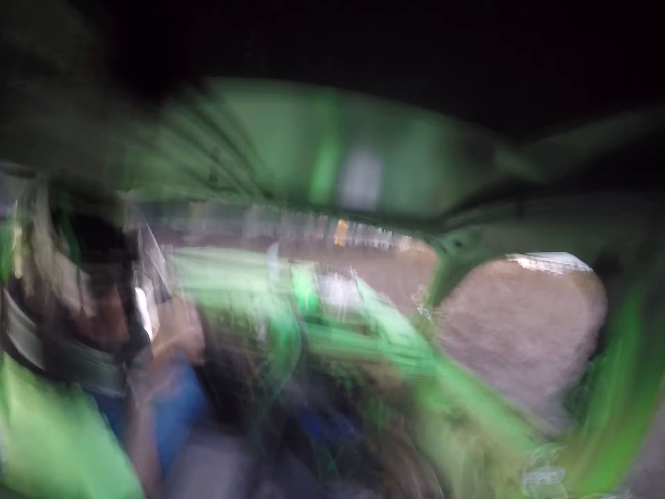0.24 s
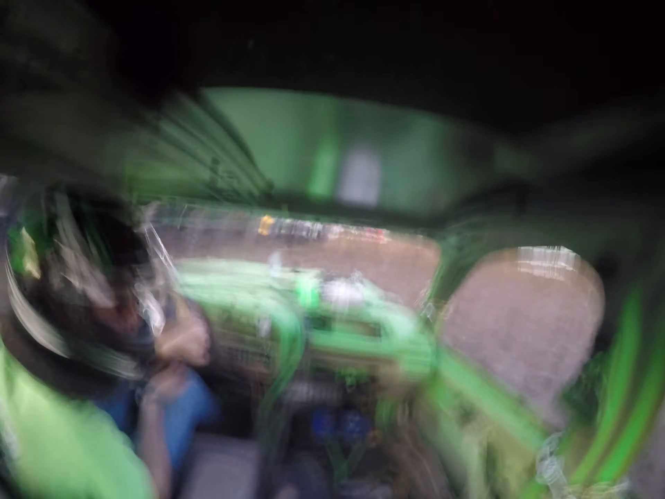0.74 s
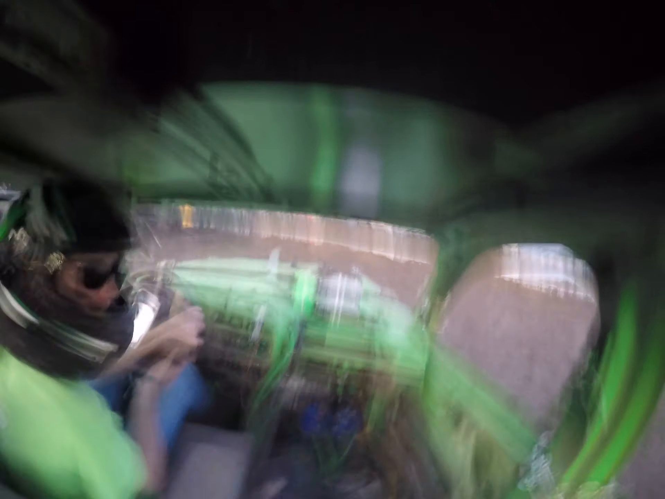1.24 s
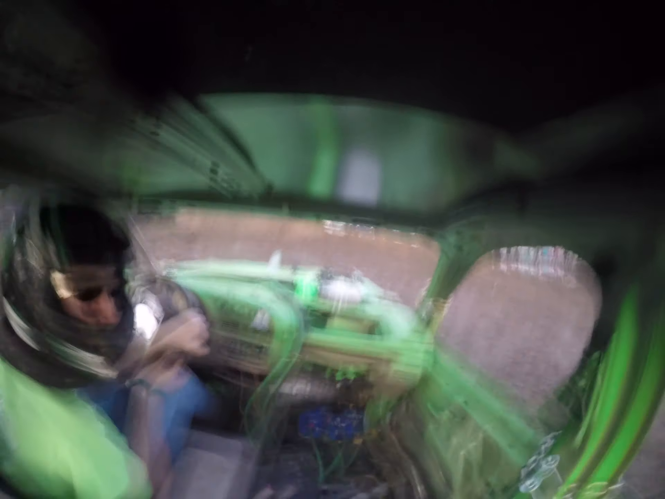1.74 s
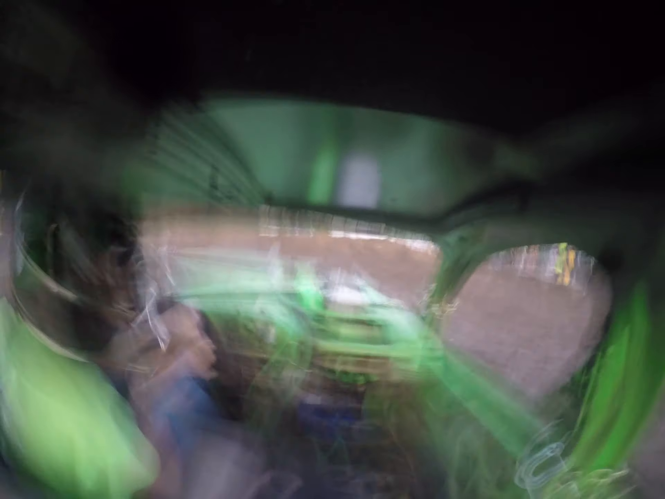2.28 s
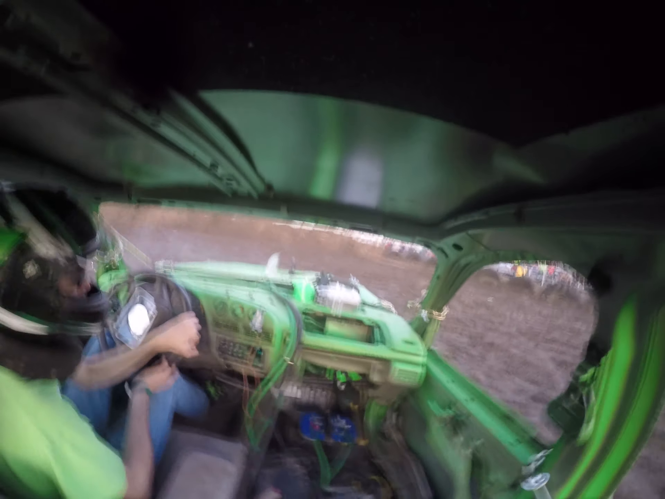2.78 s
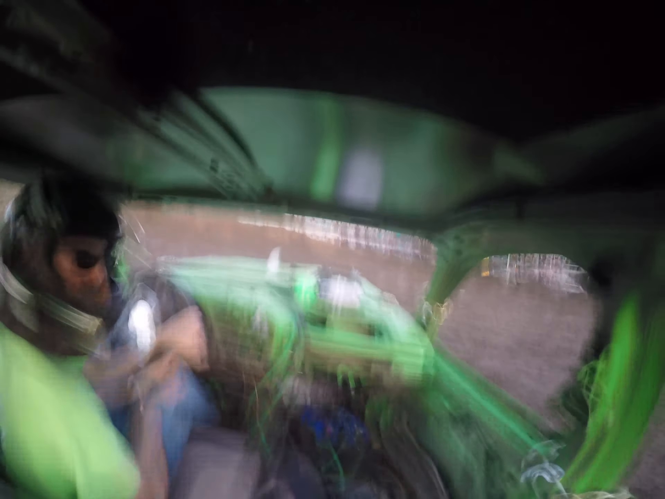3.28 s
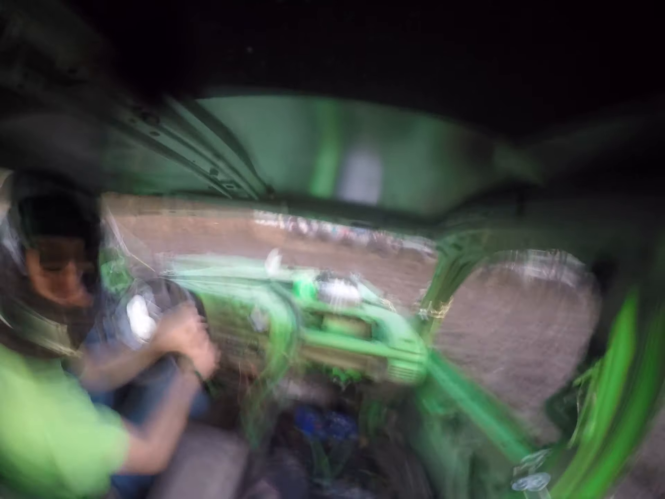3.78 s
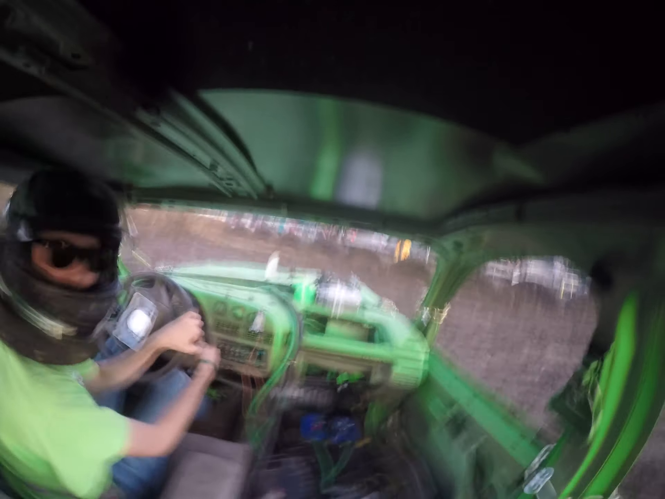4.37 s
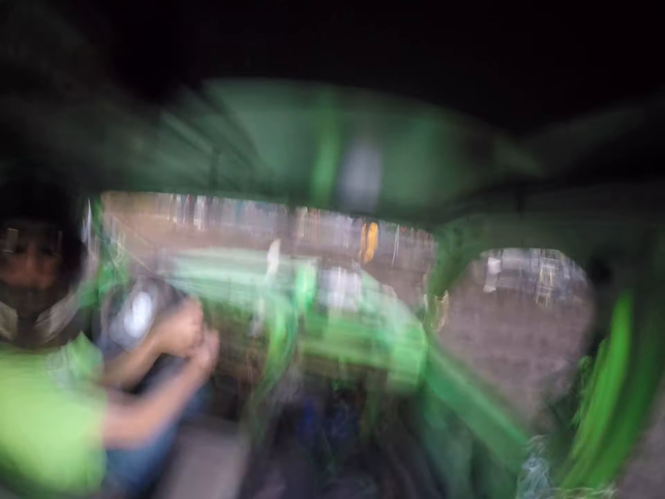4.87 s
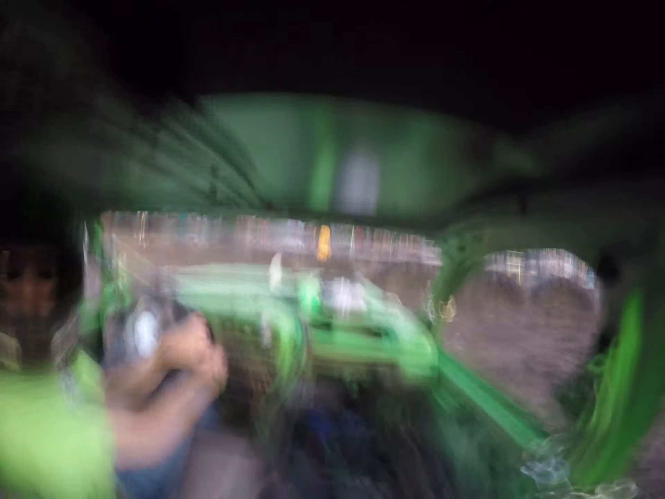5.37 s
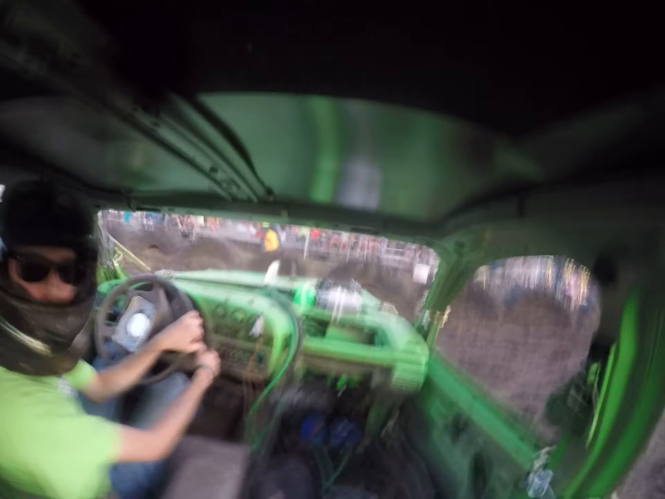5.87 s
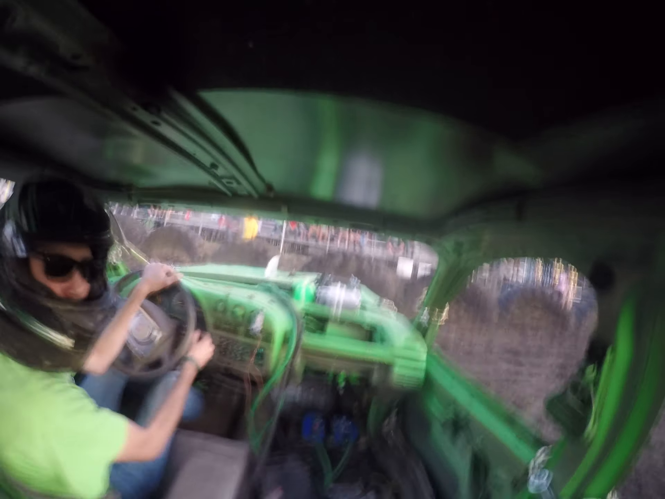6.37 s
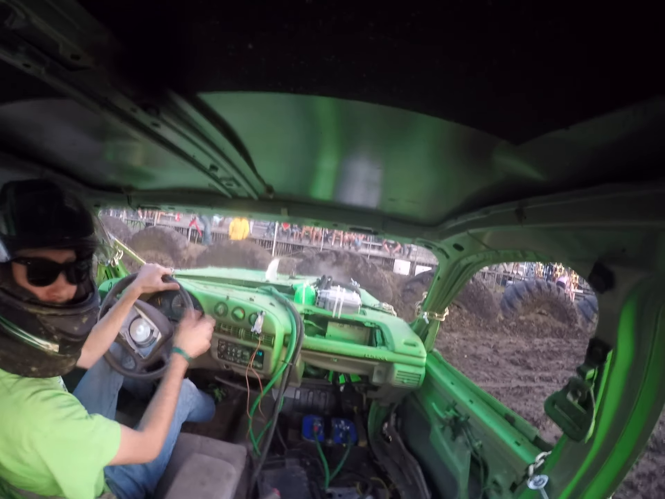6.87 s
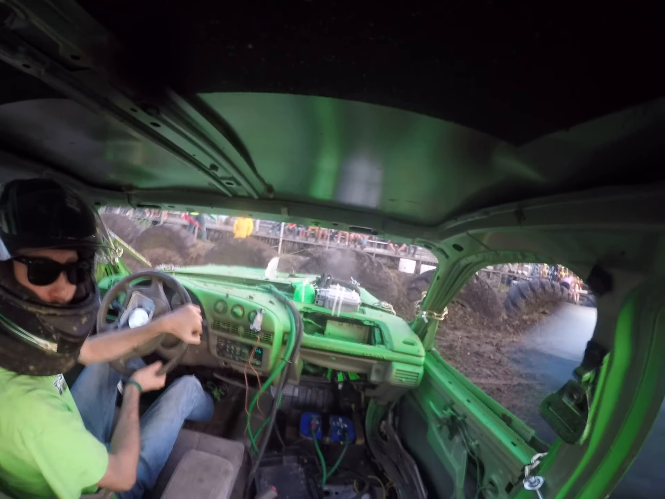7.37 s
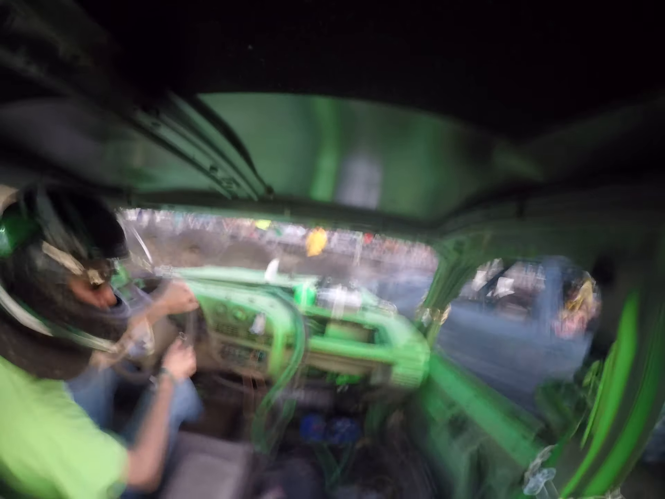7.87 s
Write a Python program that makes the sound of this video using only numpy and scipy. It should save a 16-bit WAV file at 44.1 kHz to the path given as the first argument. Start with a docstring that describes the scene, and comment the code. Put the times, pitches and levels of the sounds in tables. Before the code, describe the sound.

Inside a bare derby car, a damaged wheel slaps and thumps the bodywork over a labouring engine, which drops, revs up and hits with a metal crunch.

```python
"""Inside a battered derby car

An engine labours, drops back and revs up into a collision on a dirt arena: a sum of sine waves plus pulsing noise.
A damaged wheel slaps and thumps the body, at first about five times a second: decaying sines and noise bursts.
Loose parts clack and tick in short noise bursts, while the bare cab booms, rumbles and drones as it shakes.
The collision is crackling noise that comes in stages. The hardest blows overload the microphone."""
import sys
import numpy as np
from scipy import signal
from scipy.fft import rfft, irfft
from scipy.io import wavfile
from scipy.ndimage import uniform_filter1d

SR = 44100
rng = np.random.default_rng(int(sys.argv[2]) if len(sys.argv) > 2 else 0)


def dump_mix(stems):
    """Bounce the given channels to the path in sys.argv[1] as a 16-bit WAV at rate SR."""
    frames = np.atleast_2d(stems).T  # one column per channel
    limited = np.clip(frames, -1, 1)  # hard clip at full scale
    pcm = np.round(limited * 32767).astype(np.int16)
    wavfile.write(sys.argv[1], SR, pcm)


N = 358974
TIME = np.arange(N) / SR  # seconds

# Roughness of the ride. Each row: time in seconds, reference level in dB for the noises that follow the ride.
RIDE = [(0, -25), (.9, -29.5), (1.3, -26.5), (2.2, -26.5), (2.55, -34), (3.1, -35.5), (3.6, -28.5),
        (4.45, -35.5), (4.92, -23.5), (5.3, -30.5), (6.17, -26), (6.4, -40), (6.85, -51.5), (7.15, -37),
        (7.48, -29), (7.65, -30.5), (7.9, -29.5), (8.14, -37)]
# Body rocking on its springs. Each row: time in seconds, cab boom level in dB.
BOOM = [(0.0, -10.5), (0.27, -17.5), (1.29, -13.5), (1.92, -34), (1.99, -13), (2.31, -27), (3.33, -14.5),
        (4.38, -13), (4.42, -23), (4.87, -8.5), (5.28, -24.5), (5.4, -8), (5.67, -20), (8.14, -14.5)]
# Deep ruts jolt the chassis. Each row: start in seconds, peak of the swing in dB.
JOLTS = [(0.131, -10.5), (0.371, -22), (2.071, -9), (2.461, -11.5), (3.171, -6.5), (3.329, -13.5),
         (3.51, -7.5), (4.11, -6), (4.68, -10), (4.81, -20), (5.75, -17.5), (5.94, -11), (6.139, -10),
         (7.531, -10), (7.79, -11.5), (7.97, -9.5)]
# Tone of the low rumble. Each row: frequency in Hz, relative level in dB.
RUMBLE_TONE = [(25, -25.5), (40, 9), (50, 6), (65, 0.5), (90, -2.5), (125, -7), (200, -38.5)]
# Tone of the floor pan drone. Each row: frequency in Hz, relative level in dB.
DRONE_TONE = [(70, -21.5), (110, -4.5), (140, -0.5), (180, -4), (230, -0.5), (275, -2.5), (320, -15),
              (450, -39)]

# Engine speed. Each row: time in seconds, firing rate in Hz, exhaust level in dB before the pipe's tone.
ENGINE = [(0, 116.5, -36), (1.1, 122, -31.5), (2.65, 107.3, -38), (2.98, 117.8, -20), (3.35, 111.9, -28.5),
          (3.72, 117.9, -30.5), (3.9, 109.8, -25), (4.3, 117.5, -31), (5.3, 116.7, -30), (6.3, 62.7, -35.5),
          (6.85, 72.1, -39.5), (7.09, 79.8, -22.5), (7.28, 105.8, -16.5), (7.36, 111.1, -14.5),
          (7.49, 121, -13.5), (7.8, 92.6, -47), (8.14, 74, -28)]
# Notes of the uneven cylinders. Each row: multiple of the firing rate, relative level in dB.
ENGINE_ORDERS = [(.5, -26), (1, -1.5), (1.25, -34), (1.5, -3), (1.75, -13.5), (2, -9.5), (2.25, -18),
                 (2.5, -11.5), (3, -19)]
# How the exhaust pipe favours some pitches. Each row: frequency in Hz, gain in dB.
PIPE_TONE = [(40, -16), (85, 6), (109, 4), (118, -9), (130, -8.5), (155, -1), (176, 0.5), (200, 2.5),
             (228, -6.5), (255, 2), (277, -3), (305, -50), (385, -22), (500, -24)]
# Tone of the engine roar. Each row: frequency in Hz, relative level in dB.
ROAR_TONE = [(200, -13), (330, 7), (500, 8.5), (720, 11), (900, -5), (1200, 4.5), (1600, -4.5),
             (2300, -2.5), (2900, -35), (3500, -63.5), (6000, -36)]
# Tone of the engine rasp. Each row: frequency in Hz, relative level in dB.
RASP_TONE = [(900, 6), (1800, -2.5), (2450, 5.5), (2950, -2.5), (3300, -1), (4300, -3), (4800, -9.5),
             (5400, -9.5), (7000, -15.5), (8500, -23.5), (10800, -20.5), (12500, -29), (15000, -30)]
# A narrow resonance in the rasp. The one row: frequency in Hz, width in Hz, level in dB relative to the rasp.
RASP_RING = (2910, 69, -8)
# Throttle. Each row: time in seconds, reference level in dB (the treble of the rasp).
THROTTLE = [(0, -42.5), (.25, -51), (1.25, -46), (1.65, -55.5), (2.2, -54), (2.68, -61), (2.8, -57.5),
            (3.22, -51), (4.24, -51.5), (4.46, -54), (4.98, -49), (5.7, -64.5), (6.1, -65), (6.4, -73),
            (6.8, -65.5), (7.18, -44), (7.46, -41.5), (7.64, -58), (8.14, -63)]

# A loose part clacking hard. Each row: start in seconds, peak in dB.
CLACKS = [(0.2543, -12), (0.3168, -18), (0.4643, -15.5), (0.8674, -3.5), (1.0207, -13.5), (1.2099, -10),
          (1.3053, -8), (1.707, -8), (2.0072, -7), (2.3895, -13.5), (2.4905, -19), (3.5696, -17.5),
          (3.8288, -14), (3.922, -16.5), (4.0203, -16), (4.2512, -7.5), (4.3301, -8), (4.8157, -7.5),
          (4.8571, -14), (4.99, -9.5), (5.0499, -9), (5.315, -18), (5.3544, -10.5), (5.46, -10),
          (5.5273, -12), (5.6075, -18), (5.674, -15.5), (5.7498, -14.5), (5.9774, -9.5), (6.1422, -13),
          (6.3052, -23.5), (6.3894, -20), (6.7176, -38), (7.8635, -12.5), (7.9245, -14.5), (7.9619, -14.5),
          (8.0006, -16), (8.04, -13)]
# Tone of a clack. Each row: frequency in Hz, relative level in dB.
CLACK_TONE = [(300, -14.5), (900, -4.5), (1500, -12.5), (1900, -2.5), (2450, 1), (2800, -4.5), (3300, -18),
              (4200, -25), (5400, -29), (7500, -45), (15000, -46.5)]
# Small hard bits ticking. Each row: start in seconds, peak of the treble in dB.
TICKS = [(0.052, -27), (0.1281, -22), (0.184, -40), (0.3155, -36), (1.4783, -22.5), (1.6768, -25),
         (2.0859, -17), (2.336, -32), (2.4934, -37.5), (4.2184, -32.5), (4.3286, -25), (4.8218, -29.5),
         (4.9317, -23.5), (5.0115, -33.5), (5.3824, -31.5), (5.9358, -32), (6.1464, -35)]
# Tone of a tick. Each row: frequency in Hz, relative level in dB.
TICK_TONE = [(800, -33), (2500, 18.5), (4000, 9.5), (5500, 3.5), (7200, 1.5), (9000, -10.5), (11000, -1.5),
             (13000, -13), (15500, -9)]

# Sheet metal giving way in stages. Each row: start in seconds, level in dB.
CRASH = [(7.498, -3.5), (7.52, -12.5), (7.570, -9.5), (7.596, -16.5), (7.618, -35), (7.785, -37)]
# Tone of crumpling metal. Each row: frequency in Hz, relative level in dB.
CRUMPLE_TONE = [(50, -9), (140, 13.5), (270, 11.5), (400, -4), (590, 6), (1000, 0.5), (1600, -4),
                (2500, -5.5), (3300, -16.5), (4500, -25), (7000, -33.5), (10000, -45.5), (15000, -42)]

# Heavy thumps on the floor pan. Each row: start in seconds, peak in dB, strongest ring in Hz.
THUMPS = [(0.13, 0.5, 224), (0.86, -11.5, 124), (1.14, -14.5, 246), (1.292, -1.5, 190), (1.477, 1.5, 184),
          (1.677, -0.5, 154), (1.875, -5, 121), (2.086, 3, 156), (2.276, -1.5, 183), (4.121, -12.5, 192),
          (4.204, -6.5, 210), (4.805, -5.5, 172), (4.924, -7, 269), (5.001, -5.5, 134), (5.213, -10, 254),
          (5.548, -8, 149), (5.737, -6.5, 123), (5.764, -7.5, 245), (5.938, -3, 185), (6.138, -6.5, 149),
          (6.225, -11, 121), (6.387, -19.5, 121), (7.801, -10, 206.4)]
# Ringing of the floor pan. Each row: frequency in Hz, strength in dB, time to fall 60 dB in seconds.
FLOOR_PAN_MODES = [(120.6, 5, 0.1), (148.1, -1, 0.13), (184.4, 5.5, 0.069), (225.7, 0, 0.11),
                   (264.6, -1, 0.12), (370, -15.5, 0.14)]
# Tyre slapping sheet metal. Each row: start in seconds, peak of the panel ring in dB,
# strongest ring in Hz, mid-band level of the smack in dB.
SLAPS = [(0.052, -2.5, 614, -14.5), (0.239, -8.5, 548, -20.5), (0.449, -15.5, 550, -35),
         (0.66, -13, 522, -31), (0.865, -7, 550, -39), (1.208, -18, 716, -47), (1.398, -1, 520, -12.5),
         (1.598, -9, 650, -14.5), (1.792, -5.5, 578, -14), (2.004, -3.5, 600, -19),
         (2.197, -3.5, 690, -14.5), (3.618, -7.5, 623, -27), (4.914, -4.5, 554, -10), (5.456, -8, 596, -21),
         (5.526, -17, 668, -30), (5.856, -20.5, 540, -42), (6.05, -6, 855, -16.5),
         (6.222, -12.5, 614, -23.5), (6.635, -33.5, 720, -42), (6.718, -29.5, 610, -35),
         (7.758, -18.5, 634.8, -37)]
# Ringing of the panel. Each row: frequency in Hz, strength in dB,
# time to fall 60 dB in seconds before the extra fading of a slap.
PANEL_MODES = [(381, 2.5, 0.094), (474.5, 2, 0.11), (548.8, -1.5, 0.31), (563, 2.5, 0.074), (653, 3, 0.082),
               (713.5, -5, 0.17), (840, -7.5, 0.13), (971, -4.5, 0.2), (1114, 0, 0.1)]
# Tone of a smack. Each row: frequency in Hz, relative level in dB.
SMACK_TONE = [(200, -12.5), (380, 16.5), (650, 17.5), (1150, 15.0), (1900, 8), (2700, 5.5), (3400, -14.5),
              (6000, -22.0)]
# Tone of the bodywork's shudder. Each row: frequency in Hz, relative level in dB.
SHUDDER_TONE = [(220, -19.0), (370, -1.5), (620, -5), (1200, -23), (2000, -42.5)]

# Between jolts the low noise follows the ride.
RUMBLE_OVER_RIDE_DB, DRONE_OVER_RIDE_DB = 7.5, 1
# The chassis swings up in this time, near this pitch, with this spread as a fraction of the pitch.
JOLT_RISE_S, JOLT_HZ, JOLT_SCATTER = 0.023, 53.44, 0.1
# The roar grows with the throttle and with the roughness of the ride.
ROAR_OVER_THROTTLE_DB, ROAR_OVER_RIDE_DB = 4.5, -12.5
RASP_OVER_THROTTLE_DB = 8  # the whole rasp, relative to its treble
# Every blow throws a loose part: lag after a slap, level after a 0 dB blow, dB per dB of blow.
SHAKE_DELAY_S, SHAKE_DB, SHAKE_GROWTH = 0.011, -14, 0.85
# Lesser clacks come at random, this often when the ride is at this level and less often when it is smoother.
RATTLES_PER_S, ROUGH_RIDE_DB = 18, -27
RATTLE_OVER_RIDE_DB, RATTLE_SPREAD_DB = 6, 2.5
BLOW_TICK_DB = -33.5  # treble of the tick, relative to the blow that shakes the small bits
TICK_BODY_DB = 8  # a whole tick, relative to its treble
CRUNCH_RISE_S, CRUNCH_DECAY_S = 0.0044, 0.025
SCRAPE_DB, SCRAPE_S = -30, 0.36  # the cars grind along each other for this long
REBOUND_S, REBOUND_DB, REBOUND_HZ = 0.02, -6.5, 230  # each thump lands a second time
SLAP_PAN_DB, SLAP_PAN_HZ = -2, 222  # a slap also swings the floor pan, this much weaker, around this pitch
# Mainly hard thumps ring the panel: level after a 0 dB thump, dB per dB of thump, pitch.
THUMP_PANEL_DB, THUMP_PANEL_GROWTH, THUMP_PANEL_HZ = -7.5, 2.16, 479
THUMP_SMACK_DB = -3.5  # smack of a thump, relative to the panel ring
SMACK_CREST_DB = 8  # peak of a slap's smack above its mid-band level
CUTOFF_HZ = 15400  # upper limit of the microphone sound


def amp(db):
    """Turns decibels into gain."""
    return 10 ** (np.asarray(db) / 20)


def unit(x):
    """Scales a sound to rms 1."""
    return x / np.sqrt(np.mean(x ** 2) + 1e-20)


def crest(x):
    """Scales a sound to peak 1."""
    return x / (abs(x).max() + 1e-20)


def curves(rows):
    """Turns each column of a table into a curve over the whole time."""
    s, *columns = np.transpose(rows)
    return [np.interp(TIME, s, column) for column in columns]


def since(s):
    """Seconds since time s, zero before it."""
    return np.maximum(TIME - s, 0)


def shape_db(points, hz):
    """Reads a tone table on a log-frequency axis; the level falls away beyond its ends."""
    f, db = np.transpose(points)
    octave, known = np.log2(hz + 1), np.log2(f + 1)
    outside = abs(octave - np.clip(octave, known[0], known[-1]))
    return np.interp(octave, known, db) - 20 * outside


def colour(x, points, size=8192):
    """Filters a sound to the given tone without starting ahead of it (a minimum-phase filter)."""
    hz = abs(np.fft.fftfreq(size, 1 / SR))
    log_gain = np.log(amp(shape_db(points, hz)) + 1e-5)
    response = np.exp(np.conj(signal.hilbert(log_gain)))
    taps = np.fft.ifft(response).real[:size // 2]
    return signal.oaconvolve(x, taps)[:len(x)]


def wander(rate_hz):
    """Slow random motion of rms 1: noise with its faster part removed."""
    spectrum = rfft(rng.standard_normal(N))
    slow = np.exp(-(np.fft.rfftfreq(N, 1 / SR) / rate_hz) ** 2)
    return unit(irfft(spectrum * slow, N))


def steady(x, seconds):
    """Evens out the swells of a noise that are slower than the given time."""
    power = uniform_filter1d(x ** 2, max(int(seconds * SR), 2))
    return x / np.sqrt(abs(power) + 1e-12)


def add(mix, s, sound):
    """Mixes a sound in at time s."""
    part = mix[max(round(s * SR), 0):][:len(sound)]
    part += sound[:len(part)]


def burst(t, rise, decay):
    """Noise that swells softly and dies away; both times are in seconds."""
    return rng.standard_normal(len(t)) * (1 - np.exp(-(t / rise) ** 2)) * np.exp(-t / decay)


def ring(modes, t, centre_hz, octaves, scatter, rise):
    """Struck metal: decaying sines, where the place of the blow favours those near centre_hz."""
    hz, db, t60 = np.transpose(modes)[:, :, None]
    detune, phase = rng.standard_normal((2, len(modes), 1))
    favour = 1 / (1 + (np.log2(hz / centre_hz) / octaves) ** 2)
    weight = amp(db - 60 * t / t60) * favour
    swing = np.sin(2 * np.pi * (hz * (1 + scatter * detune) * t + phase))
    return crest((weight * swing).sum(0) * (1 - np.exp(-(t / rise) ** 2)))


def shell(x, wet_db, t60):
    """Dense early reflections between bare steel walls, cut after 0.1 s and duller than the direct sound."""
    t = TIME[:SR // 10]
    taps = unit(rng.standard_normal(len(t)) * amp(-60 * t / t60)) / np.sqrt(len(t))
    taps = signal.lfilter(*signal.butter(2, 3500, fs=SR), taps)
    return x + amp(wet_db) * signal.oaconvolve(x, taps)[:len(x)]


def cab():
    """The cab booms at its lowest resonance, the chassis rumbles and swings over ruts, the floor pan drones."""
    boom_db, = curves(BOOM)
    ride_db, = curves(RIDE)
    boom_hz = 28.76 * (1 + 0.1306 * wander(7.33))
    boom = unit(np.sin(2 * np.pi * np.cumsum(boom_hz) / SR) * amp(1.6 * wander(4.8)))
    rumble = steady(colour(rng.standard_normal(N), RUMBLE_TONE), 0.064) * amp(4.1 * wander(11))
    drone = steady(colour(rng.standard_normal(N), DRONE_TONE), 0.28)
    low_noise = rumble * amp(RUMBLE_OVER_RIDE_DB) + drone * amp(DRONE_OVER_RIDE_DB)
    out = boom * amp(boom_db) + low_noise * amp(ride_db)
    for s, db in JOLTS:
        age = since(s) / JOLT_RISE_S
        hz = JOLT_HZ * (1 + JOLT_SCATTER * rng.uniform(-0.86, 1))
        swell = age * np.exp(1 - age)  # reaches 1 after the rise time
        out += amp(db) * swell * np.sin(2 * np.pi * hz * since(s))
    return out


def engine():
    """Multiples of the firing rate sound through the pipe; roar and rasp are noise pulsing with the firing."""
    firing_hz, exhaust_db = curves(ENGINE)
    throttle_db, = curves(THROTTLE)
    ride_db, = curves(RIDE)
    firings = np.cumsum(firing_hz * (1 + .008 * wander(14))) / SR  # running count, slightly uneven
    note = np.zeros(N)
    for k, db in ENGINE_ORDERS:
        throb_db = 2.5 * wander(14)
        level_db = db + shape_db(PIPE_TONE, k * firing_hz) + throb_db
        note += amp(level_db) * np.sin(2 * np.pi * k * (firings + rng.random()))
    # One pulse per firing, and a slower one that favours every other firing.
    puffs = 1 + 0.18 * np.cos(2 * np.pi * firings) + 0.23 * np.cos(np.pi * firings)
    roar = unit(colour(rng.standard_normal(N) * puffs * amp(1.8 * wander(25)), ROAR_TONE))
    rasp = unit(colour(rng.standard_normal(N) * puffs * amp(1.0 * wander(26)), RASP_TONE))
    ring_hz, width_hz, ring_db = RASP_RING
    resonance = signal.lfilter(*signal.iirpeak(ring_hz, ring_hz / width_hz, SR), rasp)
    rasp += amp(ring_db) * unit(resonance)
    roar_gain = np.hypot(amp(throttle_db + ROAR_OVER_THROTTLE_DB), amp(ride_db + ROAR_OVER_RIDE_DB))
    hiss = roar * roar_gain + rasp * amp(throttle_db + RASP_OVER_THROTTLE_DB)
    return note * amp(exhaust_db) + shell(hiss, wet_db=-10.5, t60=0.27)


def chatter(ride_db):
    """Faint chatter of loose parts: many random tiny grazes, louder on a rough ride."""
    hits = rng.random(N) < 60 / SR  # about 60 a second
    strikes = hits * amp(4 * np.minimum(rng.exponential(1, N), 2))
    grazes = signal.oaconvolve(strikes, np.hanning(SR // 300), "same") * rng.standard_normal(N)
    return unit(colour(grazes, CLACK_TONE)) * amp(0.73 * ride_db - 27.5)


def clatter():
    """Loose parts strike and rebound in short noise bursts, shaken by each blow and by the ride."""
    clacks, ticks, t = np.zeros(N), np.zeros(N), TIME[:SR // 12]
    ride_db, = curves(RIDE)
    blows = [(s + SHAKE_DELAY_S, db) for s, db, *_ in SLAPS] + [(s, db) for s, db, _ in THUMPS]
    thrown = [(s, SHAKE_DB + SHAKE_GROWTH * db) for s, db in blows]
    rattle_db = ride_db + RATTLE_OVER_RIDE_DB + RATTLE_SPREAD_DB * rng.standard_normal(N)
    rattle_rate = RATTLES_PER_S * amp(ride_db - ROUGH_RIDE_DB)
    rattle_samples = np.flatnonzero(rng.random(N) < rattle_rate / SR)
    rattles = [(TIME[i], rattle_db[i]) for i in rattle_samples]
    for s, db in CLACKS + thrown + rattles:
        contact = burst(t, 0.0015, 0.00065) + 0.058 * burst(t, 0.0014, 0.0026)
        clack = amp(db) * crest(colour(contact, CLACK_TONE))
        add(clacks, s - .0004, clack)
        add(clacks, s + rng.uniform(.008, 0.029), amp(rng.uniform(-13.5, -5.5)) * clack)  # rebound
    shaken = [(s, db + BLOW_TICK_DB) for s, db in blows]
    for s, db in TICKS + shaken:
        contact = burst(t, 0.0026, 0.0019) + 0.041 * burst(t, 0.00067, 0.012)
        tick = amp(db + TICK_BODY_DB) * crest(colour(contact, TICK_TONE))
        add(ticks, s - .0004, tick)
        add(ticks, s + rng.uniform(0.012, 0.028), amp(rng.uniform(-22, -9)) * tick)  # rebound
    return clacks + ticks + chatter(ride_db)


def collision():
    """Buckling metal: snaps over a grinding scrape; the heavy panels give way just after the first crunch."""
    start = CRASH[0][0]
    force = amp(SCRAPE_DB) * (TIME > start) * (TIME < start + SCRAPE_S)
    for s, db in CRASH:
        age = since(s)
        force = force + amp(db) * np.minimum(age / CRUNCH_RISE_S, 1) * np.exp(-age / CRUNCH_DECAY_S)
    snaps = (rng.random(N) < 600 / SR) * rng.standard_normal(N)  # about 600 a second
    crackle = unit(snaps) + 1.37 * rng.standard_normal(N)
    crunch = steady(colour(crackle, CRUMPLE_TONE), 0.0175)
    heavy = signal.sosfiltfilt(signal.butter(2, 750, fs=SR, output="sos"), crunch)
    late_force = np.interp(TIME - .009, TIME, force)  # the low part lags by 9 ms
    return (crunch - heavy) * force + heavy * late_force


def pan_blows():
    """Lists every blow that swings the floor pan: start in seconds, peak in dB, strongest ring in Hz."""
    rebounds = [(s + REBOUND_S, db + REBOUND_DB, REBOUND_HZ) for s, db, _ in THUMPS]
    from_slaps = [(s, db + SLAP_PAN_DB, SLAP_PAN_HZ) for s, db, *_ in SLAPS]
    return list(THUMPS) + rebounds + from_slaps


def thumps():
    """Heavy blows swing the floor pan, whose low ringing dies away quickly."""
    out, t = np.zeros(N), TIME[:SR // 3]
    for s, db, hz in pan_blows():
        pan = ring(FLOOR_PAN_MODES, t, hz, octaves=0.46, scatter=0.039, rise=0.0014)
        add(out, s - .001, amp(db) * pan)
    return out


def panel_blows():
    """Lists every blow that rings the panel: start in seconds, ring peak in dB, ring in Hz, smack peak in dB."""
    rows = [(s, db, hz, smack_db + SMACK_CREST_DB) for s, db, hz, smack_db in SLAPS]
    for s, db, _ in THUMPS:
        panel_db = THUMP_PANEL_DB + THUMP_PANEL_GROWTH * db
        rows.append((s, panel_db, THUMP_PANEL_HZ, panel_db + THUMP_SMACK_DB))
    return rows


def slaps():
    """Each slap is a gritty smack, flaps of loose rubber, the ring of the panel and a shudder of the bodywork."""
    out, t = np.zeros(N), TIME[:SR // 3]
    fading = 0.16 + np.exp(-t / 0.0096)  # a strong start over a weaker ring
    for s, db, hz, smack_db in panel_blows():
        panel = crest(ring(PANEL_MODES, t, hz, octaves=0.59, scatter=0.0452, rise=0.0029) * fading)
        flaps = (rng.random(len(t)) < 500 / SR) * burst(t, 0.012, 0.028)  # sparse clicks
        smack = crest(colour(burst(t, 0.0027, 0.0072) + 2 * flaps, SMACK_TONE))
        shudder = .24 * crest(colour(burst(t, .012, .036), SHUDDER_TONE))
        add(out, s - .002, amp(db) * (panel + shudder) + amp(smack_db) * smack)
    return out


def scene():
    """Adds up bodywork, engine, loose parts, collision, thumps and slaps in one channel."""
    return (cab() + engine() + clatter() + collision() + thumps() + slaps())[None]


def record(dry):
    """The microphone smoothly flattens the highest peaks, then the top treble is cut off."""
    ceiling = .95
    held = dry / (1 + (dry / ceiling) ** 8) ** (1 / 8)
    low_pass = signal.firwin(511, CUTOFF_HZ, window=("kaiser", 9), fs=SR)
    return signal.oaconvolve(held, low_pass[None], "same")


dry = scene()
out = record(dry)
dump_mix(out)
```